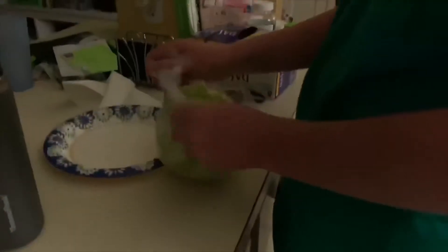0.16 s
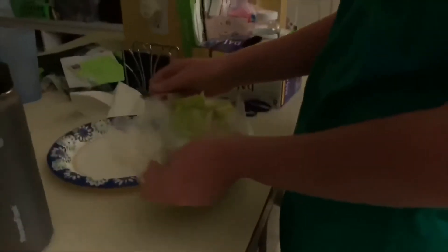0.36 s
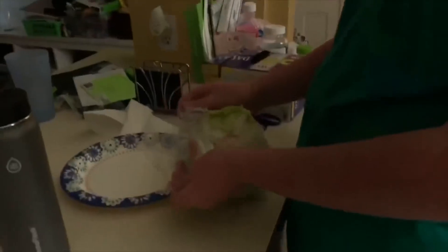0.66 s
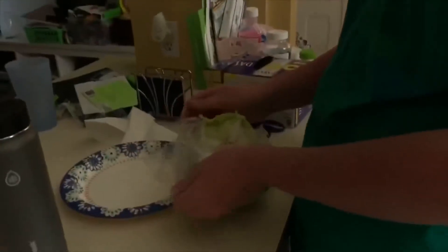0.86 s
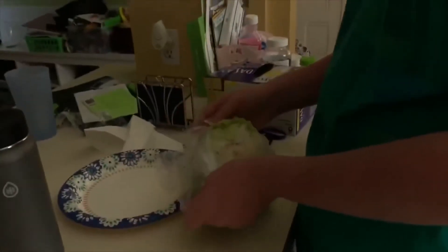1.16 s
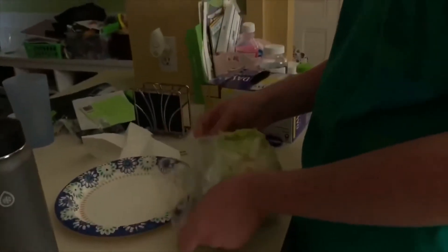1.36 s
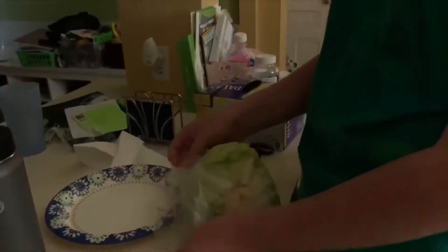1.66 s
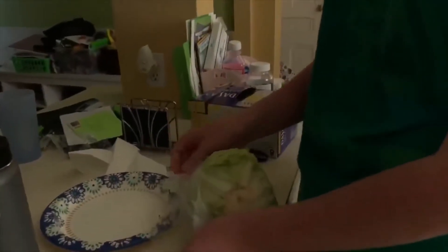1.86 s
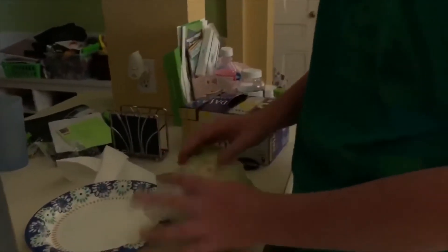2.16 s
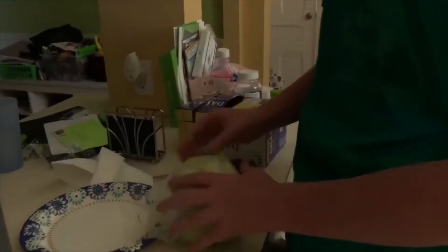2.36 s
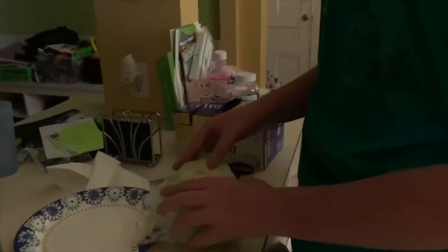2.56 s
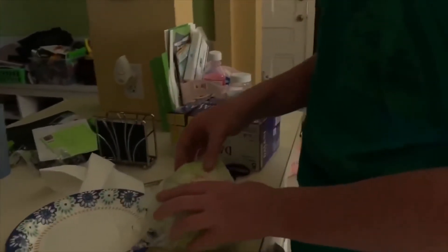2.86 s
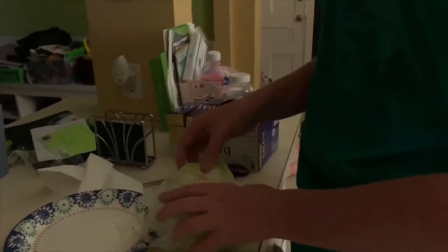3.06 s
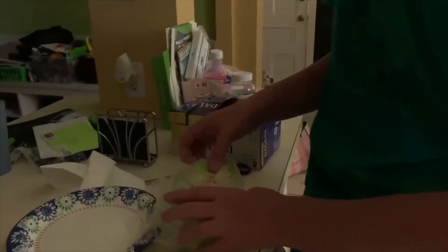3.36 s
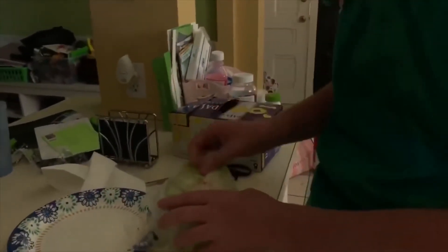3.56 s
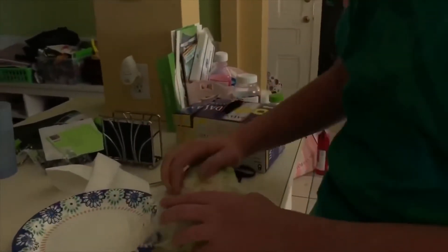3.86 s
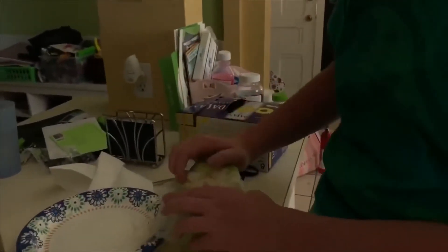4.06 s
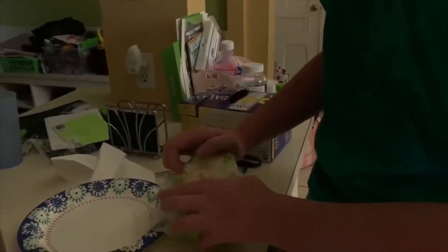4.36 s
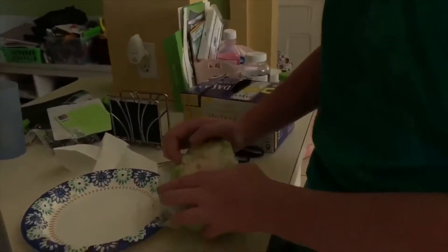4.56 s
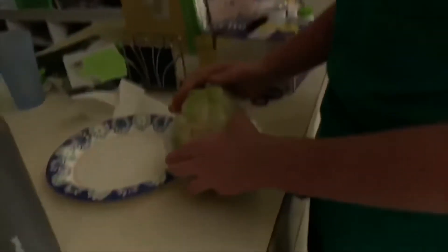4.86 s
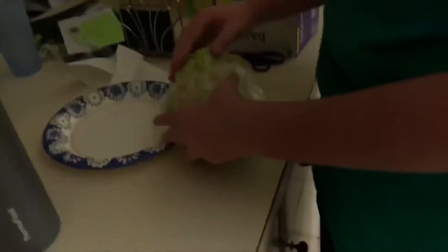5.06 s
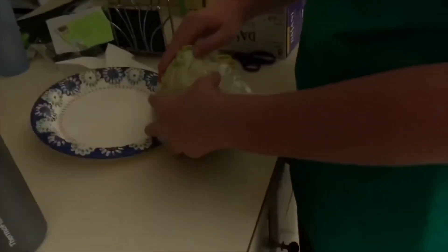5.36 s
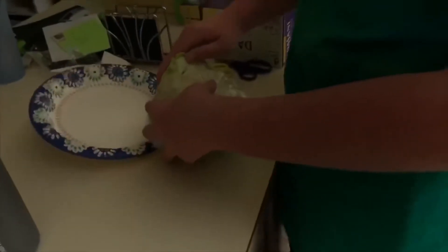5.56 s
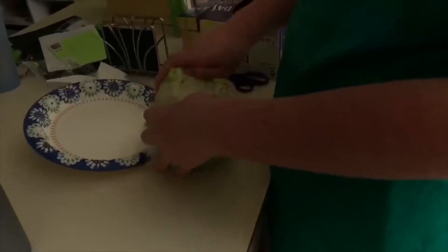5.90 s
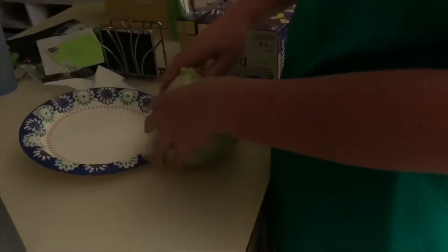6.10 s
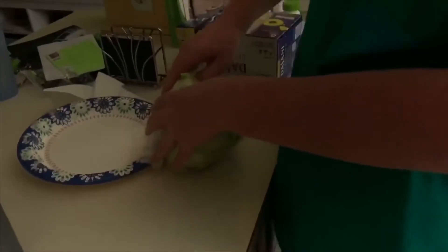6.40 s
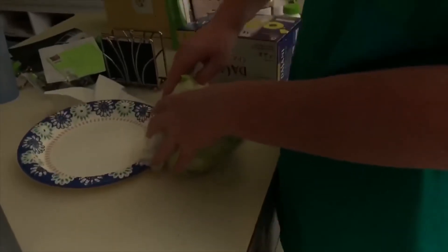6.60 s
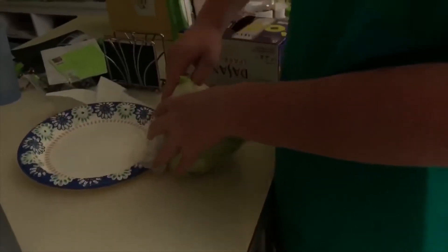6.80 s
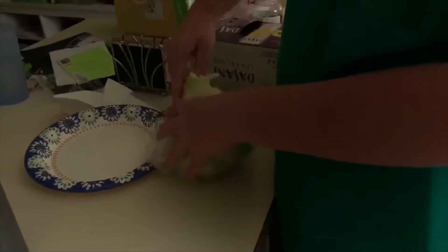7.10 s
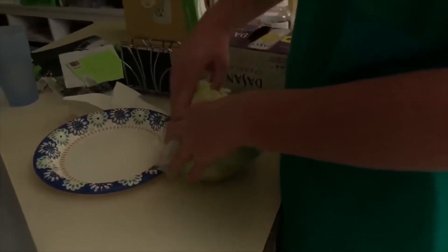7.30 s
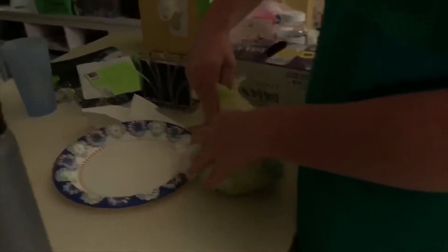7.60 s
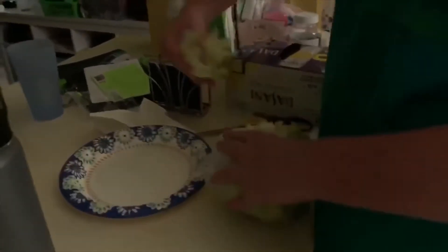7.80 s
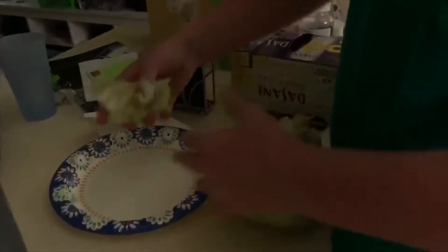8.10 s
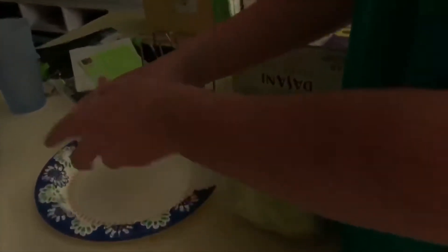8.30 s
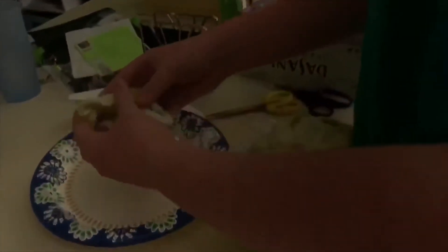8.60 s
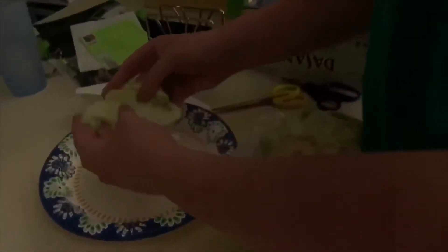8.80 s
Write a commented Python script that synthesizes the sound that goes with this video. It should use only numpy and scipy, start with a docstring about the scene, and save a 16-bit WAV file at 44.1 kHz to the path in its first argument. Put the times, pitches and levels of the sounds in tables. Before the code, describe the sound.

Hands crinkle thin plastic wrap around a head of lettuce, with wet leaf crunches and snaps over a faint fridge hum.

```python
"""Plastic film crinkles in dense tiny cracks as hands turn a wrapped head of lettuce and pull a leaf off.
Leaves crunch, ribs snap, pop and ring the head, and fingers stick and slip on wet leaf in short squeaks.
The counter and kitchen answer briefly over a fridge hum; a hand-held phone a metre away thuds softly
as the grip shifts."""
import sys
import numpy as np
from scipy import signal
from scipy.fft import rfft, irfft
from scipy.io import wavfile
from scipy.ndimage import uniform_filter1d

SR = 44100
rng = np.random.default_rng(int(sys.argv[2]) if len(sys.argv) > 2 else 0)


def master_out(mix):
    """Clip the mix to full scale and print it as 16-bit PCM to the path in sys.argv[1]."""
    frames = np.transpose(np.atleast_2d(mix))
    ceiling = np.clip(frames, -1, 1)
    pcm = np.round(ceiling * 32767).astype(np.int16)
    wavfile.write(sys.argv[1], SR, pcm)


N = 394560
BIN_HZ = np.arange(N // 2 + 1) * SR / N


def undb(db):
    return 10 ** (np.asarray(db) / 20)


def set_rms(x, db):
    return x * undb(db) / np.sqrt(np.mean(x ** 2))


def colour(x, points):
    """Weights the spectrum by (frequency [Hz], gain [dB]) points."""
    hz, db = np.transpose(points)
    bins = np.arange(len(x) // 2 + 1) * SR / len(x) + 1
    return irfft(rfft(x) * undb(np.interp(np.log(bins), np.log(hz), db)), len(x))


def wander(rate_hz):
    """Random steps, smoothed twice; spread near 1."""
    hold = int(SR / rate_hz)
    steps = np.repeat(rng.standard_normal(N // hold + 1), hold)
    return 1.5 * uniform_filter1d(uniform_filter1d(steps, hold), hold)[:N]


def add(out, start_s, sound):
    i = int(start_s * SR)
    out[i:i + len(sound)] += sound[:N - i]


# motor lines: (frequency [Hz], width [Hz], level before panning [dB])
FRIDGE_LINES = [(59, 22, -69), (118.5, 16, -69.5), (215.5, 24, -64), (473, 6.4, -72.5)]
# room air spectrum: (frequency [Hz], gain [dB])
AIR_EQ = [(25, -7.5), (120, -8.5), (300, -7.5), (480, -10.5), (800, -18), (3000, -22.5), (6000, -26.5),
          (9000, -32.5), (16000, -30)]


def fridge():
    """Wavering motor lines, a little to the right, over room air whose bass is alike on both sides."""
    hum = np.zeros(N)
    for hz, width_hz, db in FRIDGE_LINES:
        line = rfft(rng.standard_normal(N)) / (1 + (2 * (BIN_HZ - hz) / width_hz) ** 2)
        hum += set_rms(irfft(line, N), db)
    mid, side = (colour(rng.standard_normal(N), AIR_EQ) for _ in range(2))
    side = colour(side, [(40, -10), (300, -2), (2500, -1.5)])
    air = set_rms(np.array([mid + side, mid - side]), db=-59)
    return hum * undb([[-1], [1]]) + air


# grip shifts: (time [s], length [s], level before fades [dB], pitch [Hz])
GRIP_SHIFTS = [(0, 0.19, -49, 60), (6.845, 0.12, -47.5, 62), (7.587, .06, -49, 140), (8.12, 0.19, -49, 32),
               (8.542, 0.11, -53.5, 40)]
# thud spectrum: (frequency [x pitch], gain [dB])
THUD_EQ = [(.4, -20), (1, 0), (2.5, -13), (5, -28), (11, -60)]


def thuds():
    """The grip shifts on the phone: soft low rumble, mono."""
    out = np.zeros(N)
    for start_s, length_s, db, hz in GRIP_SHIFTS:
        spectrum = [(ratio * hz, gain_db) for ratio, gain_db in THUD_EQ]
        rumble = set_rms(colour(rng.standard_normal(SR), spectrum), db)
        n = int(length_s * SR)
        add(out, start_s, rumble[:n] * np.hanning(n) ** .5)
    return out


def reflections(x, channels, t60_s=.14):
    """Each band's power builds up and fades, with fresh phases as hands and leaves move."""
    power = np.abs(signal.stft(x, nperseg=256)[2]) ** 2
    for decay_s in (t60_s, t60_s / 4):
        feedback = 1e-6 ** (128 / SR / decay_s)
        power = signal.lfilter([0, 1 - feedback], [1, -feedback], power)
    phases = np.exp(2j * np.pi * rng.random((channels,) + power.shape))
    return signal.istft(np.sqrt(power) * phases, nperseg=256)[1][:, :N]


# room reflection spectrum: (frequency [Hz], gain [dB])
KITCHEN_EQ = [(200, -1), (1500, -0.5), (3000, 3), (5500, 3), (7500, -5), (16000, -7)]


def kitchen(x):
    """The room reflects from all round, differently in each channel."""
    return reflections(colour(x, KITCHEN_EQ), channels=2)


def counter_bounce(x, delay_ms=.8):
    """One early reflection off the counter top, alike at both ports."""
    reflected = colour(x, [(1500, -25), (3000, -4), (6000, -5), (8000, -22)])
    return np.roll(reflected, int(delay_ms * SR / 1000))


# left port over right: (frequency [Hz], phase lead [rad])
PORT_LEAD = [(1500, 0), (2800, 2.4), (5600, 3.2), (7750, 0), (15450, -4 * np.pi)]
# left port over right: (frequency [Hz], gain [dB])
PORT_BALANCE = [(500, 0), (1300, 3), (3500, 0), (6300, -2), (8000, .5)]


def ports(x):
    """Sound from the hands reaches two microphone ports; phase and balance vary with frequency."""
    lead_rad = np.interp(BIN_HZ, *np.transpose(PORT_LEAD))
    balance_db = np.interp(BIN_HZ, *np.transpose(PORT_BALANCE))
    half = np.exp(.5j * lead_rad) * undb(balance_db / 2)
    return np.array([irfft(rfft(x) * half, N), irfft(rfft(x) / half, N)])


# lettuce head modes: (frequency [Hz], relative level [dB], t60 [s])
HEAD_MODES = [(330, -7, 0.026), (541, -3.5, 0.017), (740, 1.5, 0.016), (1560, -1, 0.0093),
              (1935, 3.5, 0.008), (3110, 9, 0.0027)]
OPPOSED_MODE = 3  # inverted: leaves a hollow near 1.2 kHz


def ring_head(push, pitch=1.):
    """The dense head rings in damped modes; each swells in about a cycle, so the lows come late."""
    t = np.arange(3000) / SR
    modes = np.zeros(len(t))
    for k, (hz, db, t60_s) in enumerate(HEAD_MODES):
        sign = -1 if k == OPPOSED_MODE else 1
        envelope = (1 - np.exp(-t * hz)) * 1000 ** (-t / t60_s)
        modes += sign * undb(db) * np.sin(2 * np.pi * hz * pitch * t) * envelope
    modes = signal.lfilter([1, -1], [1, -.985], modes)  # the ring carries no deep bass
    return signal.fftconvolve(push, modes / np.abs(modes).max())[:N]


# finger slides: (time [s], length [s], slip rate [Hz], drive level [dB])
SLIDES = [(3.88, 0.021, 532, -35), (4.057, 0.016, 350, -31)]


def squeaks():
    """Soft skin sticks and slips almost evenly on the big wet outer leaves: a low, dull ring."""
    slips = np.zeros(N)
    for start_s, length_s, hz, db in SLIDES:
        t = np.cumsum(1 + .06 * rng.standard_normal(40)) / hz
        t = t[t < length_s]
        slips[((start_s + t) * SR).astype(int)] = undb(db) * np.sin(np.pi * t / length_s)
    return colour(ring_head(slips, pitch=.72), [(1500, 0), (3500, -12)])


def pop(hz, t60_s=.011):
    """One wet pocket of leaf bursts and rings at its own pitch."""
    t = np.arange(800) / SR
    return 2 * np.sin(2 * np.pi * hz * t) * (1 - np.exp(-hz * t)) * 1000 ** (-t / t60_s)


# bursting ribs: (time [s], pitch [Hz], level [dB])
RIB_POPS = [(3.405, 1900, -29), (3.41, 420, -25), (3.4505, 1800, -27), (3.459, 1600, -31), (5.91, 450, -38),
            (6.247, 2000, -36), (6.31, 1500, -37), (6.856, 1420, -27), (6.871, 1940, -26),
            (6.884, 1590, -27), (6.89, 1720, -27), (6.915, 1940, -29), (6.922, 690, -27), (6.873, 600, -30),
            (7.409, 2070, -35), (7.519, 700, -40), (8.032, 2500, -39), (8.82, 990, -37), (8.848, 775, -35)]


def ribs():
    """Juicy ribs give the loudest pops, one by one."""
    out = np.zeros(N)
    for start_s, hz, db in RIB_POPS:
        add(out, start_s, undb(db) * pop(hz))
    return out


# single fractures: (time [s], relative level [dB], jolt offset [dB])
LONE_CRACKS = [(0.607, -34, -25), (0.7127, -42, -30), (0.7536, -39, -28), (0.842, -33, -32),
               (0.8535, -32, -30), (1.025, -32, -15), (1.112, -37, -19), (1.1604, -33, -29),
               (1.2358, -38, -25), (1.4559, -34, -16), (1.5024, -29, -36), (1.9578, -38.5, -22),
               (2.0438, -34.5, -32), (2.236, -29, -30), (2.46, -35, -28), (2.962, -44, -35),
               (2.9876, -33.5, -39), (3.0065, -44, -30), (3.0245, -40, -32), (3.078, -42, -34),
               (3.0873, -44, -30), (3.1406, -41, -35), (3.1593, -34.5, -39), (3.329, -37, -18),
               (3.4021, -29, -10), (3.597, -37.5, -23), (4.285, -34, -27), (4.292, -37, -30),
               (4.3088, -33, -28), (4.7024, -37, -18), (4.7326, -35, -22), (4.7925, -37, -35),
               (4.82, -38, -14), (4.8331, -34, -20), (5.061, -38, -25), (5.1977, -36.5, -35),
               (5.3262, -39, -35), (5.6825, -34, -24), (5.7388, -37, -28), (5.766, -36, -28),
               (5.7743, -35, -29), (5.882, -39, -12), (6.128, -40, -17), (6.2405, -34, -30),
               (6.4245, -33, -14), (6.453, -36, -10), (6.541, -38, -16), (6.621, -36, -15),
               (6.7169, -36.5, -14), (6.7523, -29.5, -11.5), (6.81, -31, -13), (7.349, -39, -35),
               (7.5885, -9, -12), (8.0235, -33, -30), (8.322, -35, -35), (8.7358, -35, -18),
               (8.776, -32, -22), (8.82, -30, -28), (8.825, -30, -25), (8.8586, -31, -18)]
# fracture spectrum: (frequency [Hz], gain [dB])
CRACK_EQ = [(1300, -30), (2700, -1), (4800, -8), (6300, 0), (7900, 6), (12000, 2.5), (16000, -4)]
CRACK_MS, SPLINTER_MS, SPLINTER_DB = .35, 3.0, -21


def cracks():
    """A burst of fracture noise, then a tail as fibres go on parting; the jolt rings the head."""
    bursts, jolts = np.zeros(N), np.zeros(N)
    ms = 1000 * np.arange(800) / SR
    snap = ms / CRACK_MS * np.exp(-1.5 * ms / CRACK_MS)
    splinter = undb(SPLINTER_DB) * np.exp(-ms / SPLINTER_MS)
    for start_s, db, jolt_db in LONE_CRACKS:
        spectrum = rfft(rng.standard_normal(len(ms)) * (snap + splinter))
        whitened = irfft(spectrum / np.sqrt(uniform_filter1d(np.abs(spectrum) ** 2, size=40)))
        add(bursts, start_s, undb(db) * whitened)
        jolts[int((start_s + .0006) * SR)] = undb(db + jolt_db)
    return colour(bursts, CRACK_EQ) * undb(15.5) + ring_head(jolts) * undb(13)


# squeezes: (peak time [s], film level [dB], leaf offset [dB], rise [s per 10 dB])
HAND_SQUEEZES = [(0.0, -43, -5, .07), (0.165, -39, -8, .07), (0.285, -38.5, -8, .075), (0.41, -46, -9, .02),
                 (0.45, -42, -10, .1), (0.752, -50, -12, .07), (0.852, -40, -15, .025),
                 (0.98, -37.5, -5, .015), (1.074, -45, -5, .06), (1.18, -48, -14, .07),
                 (1.365, -42, -6, .12), (1.52, -50, -5, .05), (1.64, -48, -7, .06), (1.84, -50.5, -5.5, .2),
                 (2.231, -47, -17, .06), (2.315, -41, -9, .04), (2.45, -50.5, -7, .14),
                 (3.031, -54, -29, .02), (3.215, -54, -9, .04), (3.265, -46.5, -10, .03),
                 (3.345, -46, -4, .035), (3.798, -52, -9, .09), (3.885, -51, 0, .025),
                 (4.017, -52.5, -5.5, .035), (4.078, -52, 1, .025), (4.3, -51, -7, .16),
                 (4.633, -48.5, -9, .08), (4.745, -49.5, -7, .04), (4.929, -49, -8, .17),
                 (5.258, -55, -14, .08), (5.409, -47, -8, .08), (5.884, -47, -8, .14), (6.1, -50, -5, .14),
                 (6.25, -49, -3, .03), (6.316, -48, -6, .07), (6.465, -49, -1.5, .05), (6.52, -48, -2, .05),
                 (6.62, -46, -3, .02), (6.759, -44.5, -5, .04), (6.835, -43, -3, .02), (7.0, -45, -9, .12),
                 (7.423, -47, -1.5, .1), (7.9, -45, -12, .06), (8.026, -46, -14, .025),
                 (8.231, -49, -22, .1), (8.483, -54, -14, .05), (8.622, -49, -16, .07),
                 (8.778, -38, -10, .035), (8.856, -43.5, -7, .04)]
# quick rips: (peak time [s], film level [dB], leaf offset [dB], fade [s per 10 dB])
HAND_TEARS = [(3.404, -30.5, -8, .03), (3.455, -37, -5, .05), (6.86, -32.5, -3, .07),
              (6.905, -36, -3, .035), (7.599, -34, -4.5, .09), (8.738, -43, -11, .05)]
SQUEEZE_FADE_RATIO, TEAR_RISE_S = 1.3, .012


def handling():
    """Film and leaf gains: squeezes and tears rise and fall linearly in dB and add in power."""
    t = np.arange(0, N, 64) / SR
    moves = [(s, db, leaf, rise, SQUEEZE_FADE_RATIO * rise) for s, db, leaf, rise in HAND_SQUEEZES]
    moves += [(s, db, leaf, TEAR_RISE_S, fade) for s, db, leaf, fade in HAND_TEARS]
    peak_s, film_db, leaf_db, rise_s, fade_s = np.array(moves).T[:, :, None]
    drop_db = 10 * np.where(t < peak_s, (peak_s - t) / rise_s, (t - peak_s) / fade_s)
    film_power = undb(film_db - drop_db) ** 2
    leaf_power = film_power * undb(leaf_db) ** 2
    return [np.sqrt(np.interp(np.arange(N) / SR, t, p.sum(axis=0))) for p in (film_power, leaf_power)]


def grains(rate_hz, spread_db, bunch_db=2.5):
    """Many faint cracks and few strong ones, in bunches; power is independent of rate."""
    draw = (2 * rng.random(N) - 1) * SR / rate_hz
    impulses = (np.abs(draw) < 1) * np.sign(draw)
    size_db = np.minimum(-spread_db * np.log(np.abs(draw) + 1e-9), 16)
    return impulses * undb(size_db + bunch_db * wander(rate_hz=110)) / np.sqrt(rate_hz)


# film spectrum: (frequency [Hz], gain [dB])
FILM_EQ = [(300, -26), (1000, -9.5), (2500, -3.5), (5000, -2.5), (8200, 2), (11500, 2), (14500, -1),
           (16000, -7.5)]
# crease bands, long creases to short: (centre [Hz])
CREASE_BANDS_HZ = [1500, 4000, 8500, 14000]
# small wet leaf pockets: (pitch [Hz])
POCKETS_HZ = [700, 1650, 2150]
STUTTER_DB, STUTTER_HZ = 1.5, 70


def crinkle():
    """Film creases crack brightly, leaves crunch through the head; firmer handling cracks more densely."""
    film_gain, leaf_gain = handling()
    density = np.clip((film_gain / undb(-50)) ** 1.3, .25, 9)
    creases = sum(colour(grains(620 * density, spread_db=3.3), [(hz / 2, -14), (hz, 0), (hz * 2, -14)])
                  for hz in CREASE_BANDS_HZ)
    film = set_rms(colour(creases, FILM_EQ), db=0)
    # big outer leaves ring lower, small inner ones higher
    crunch = sum(ring_head(grains(250 * density, spread_db=3.44), pitch) for pitch in (.74, 1.1))
    pops = sum(signal.fftconvolve(grains(90 * density, spread_db=3.4), pop(hz))[:N] for hz in POCKETS_HZ)
    leaf = set_rms(crunch, db=-2.5) + set_rms(pops, db=-9)
    stutter = undb(STUTTER_DB * wander(STUTTER_HZ))  # the film gives way in fits
    return film_gain * stutter * film + leaf_gain * leaf


def scene(counter_db=-8, lone_send_db=-6):
    rustle = crinkle()
    lone = cracks() + squeaks() + ribs()
    direct = rustle + lone
    send = rustle + undb(lone_send_db) * lone  # lone cracks beam at the phone; the room gets less
    counter = undb(counter_db) * reflections(send, channels=1)[0]  # arrives from the side of the hands
    return ports(direct + counter) + counter_bounce(direct) + kitchen(send) + thuds() + fridge()


def record(dry):
    """The phone cuts the treble above 15.8 kHz."""
    return signal.sosfilt(signal.ellip(14, .2, 80, 15800, fs=SR, output="sos"), dry)


dry = scene()
out = record(dry)
master_out(out)
```